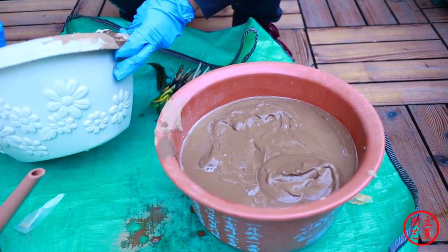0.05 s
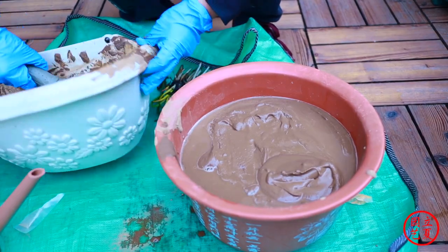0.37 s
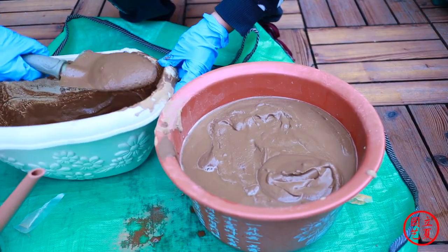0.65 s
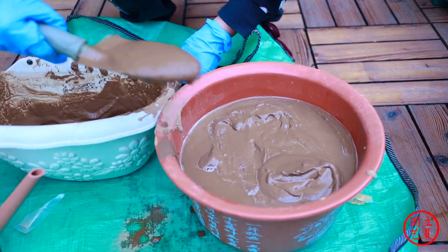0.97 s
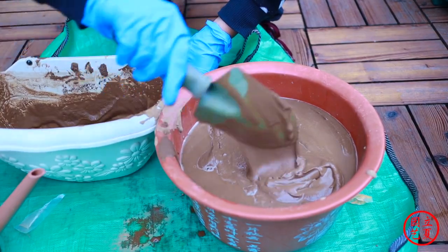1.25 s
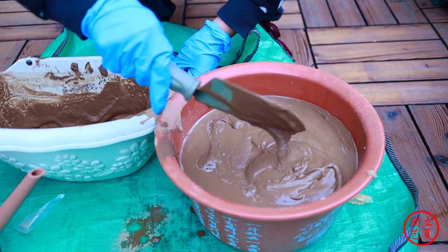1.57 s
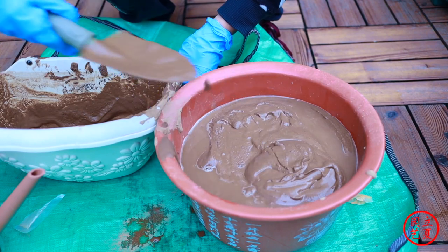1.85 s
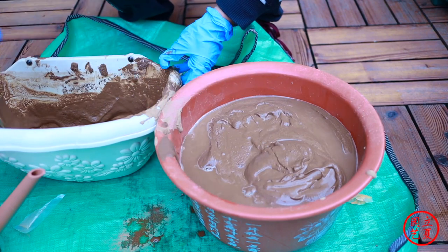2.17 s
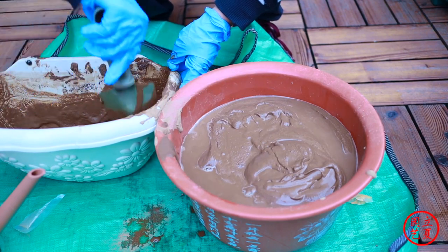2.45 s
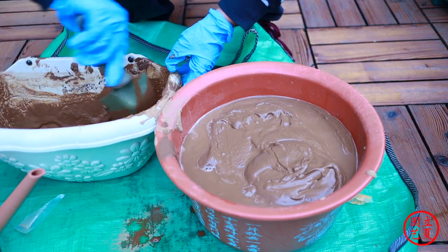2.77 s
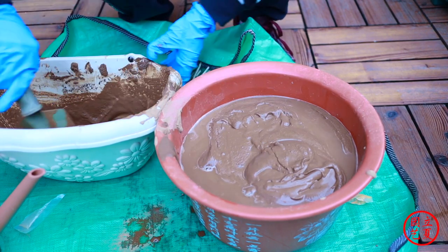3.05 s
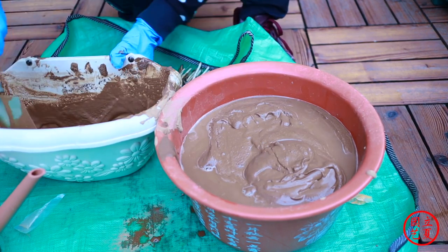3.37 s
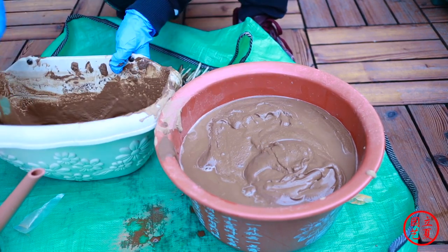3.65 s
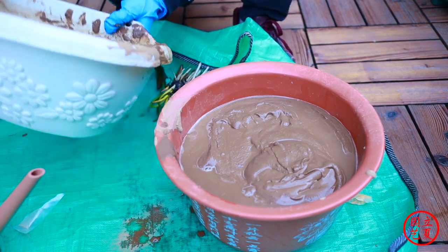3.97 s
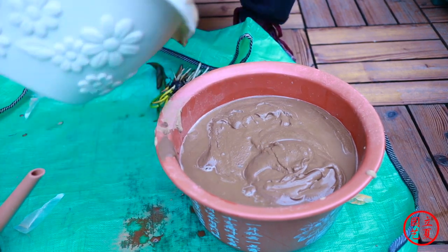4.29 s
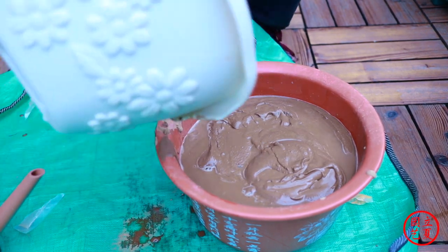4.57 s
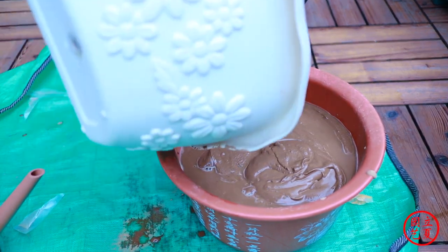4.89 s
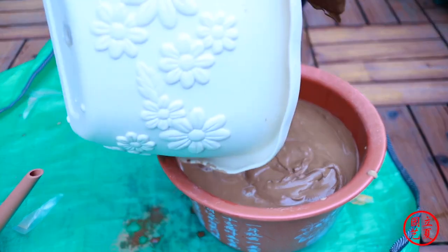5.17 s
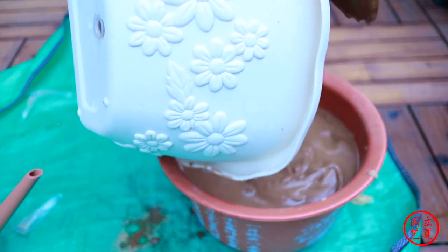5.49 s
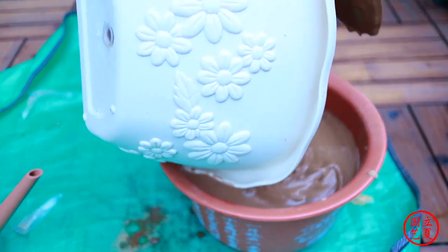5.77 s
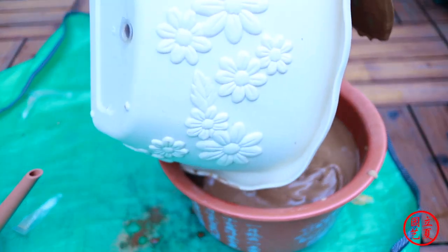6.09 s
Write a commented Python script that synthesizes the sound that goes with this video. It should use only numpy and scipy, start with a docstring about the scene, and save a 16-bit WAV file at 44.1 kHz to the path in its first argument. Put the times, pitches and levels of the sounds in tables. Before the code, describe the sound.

Thick mud is scooped from a plastic pot, then a blade scrapes its wall and rubber gloves knock and creak on it.

```python
"""Outdoors, over a soft rumble, a trowel scoops thick mud from a plastic flowerpot on a deck.
Each slip and knock rings the pot's wall and hollow. Near 1 s the mud tears free, air pockets bursting,
and drops into a second pot. A small bird calls three times, far off. From 2.35 s the blade scrapes
the wall clean in four gritty strokes while the pot thuds on the boards. From 3.8 s the pot is lifted
and tipped: rubber gloves knock and creak on it, a sleeve brushes past. Last, a faint drip or tick."""
import sys
import numpy as np
from scipy import signal
from scipy.fft import rfft, irfft
from scipy.io import wavfile
from scipy.ndimage import uniform_filter1d

SR = 44100
rng = np.random.default_rng(int(sys.argv[2]) if len(sys.argv) > 2 else 0)


def digitize_waveform(pressure):
    """Quantize a signal to 16-bit integers and store it at the path in sys.argv[1].

    Rows of a 2-D input are taken as channels; values are limited to [-1, 1].
    """
    field = np.atleast_2d(pressure).T
    bounded = np.clip(field, -1, 1)
    quanta = np.round(bounded * 32767).astype(np.int16)
    wavfile.write(sys.argv[1], SR, quanta)


N = 279153
TIME_S = np.arange(N) / SR

# Table levels are relative; the functions add the gain of each layer.
# background rumble, glove crinkle: time_s, level_db
RUMBLE_LEVEL = [(0, -48.5), (.9, -56), (1.7, -63.5), (2.2, -63), (2.7, -56), (4.85, -52), (5.25, -57.5),
                (6.33, -60)]
CRINKLE_LEVEL = [(0.0, -55.5), (0.49, -52), (0.63, -68), (0.81, -68.5), (1.69, -77.5), (2.29, -78),
                 (2.45, -69), (2.89, -68), (4.05, -61), (4.67, -63), (4.95, -73), (5.61, -79.5),
                 (6.33, -80.5)]
# noise spectra: freq_hz, density_db
RUMBLE_SPECTRUM = [(15, -73), (25, -56), (80, -9), (114, -6), (137, -0.5), (170, -4.5), (263, 0.5),
                   (309, -4), (344, -2), (531, -3.5), (818, -1), (1650, -9), (3520, -23), (6210, -29.5),
                   (16000, -38)]
CRINKLE_SPECTRUM = [(880, -19), (1500, -8), (2460, -12.5), (3410, -5), (4330, -11), (9470, -14.5),
                    (11300, -20.5), (13500, -17), (16000, -26.5)]
MUD_SPECTRUM = [(53, -39), (90, -5), (402, -2.5), (721, -4), (876, 2), (1140, -11), (1950, -3), (4650, -27),
                (7820, -22.5), (16000, -39)]
SCOOP_GRIT = [(1500, -15.5), (2100, 0.5), (2900, 0.5), (4030, -0.5), (7050, -9), (8560, -7), (11400, -17),
              (13500, -12), (16000, -23)]
SCRAPE_GRIT = [(1500, -16.5), (2100, 3), (2700, 0.5), (3650, 0.5), (4400, -4), (5500, -5.5), (6990, -9),
               (8500, -6), (10200, -16), (13900, -13), (16000, -28.5)]
GRIP_GRIT = [(1500, -25), (2100, 4.5), (2900, 3), (3900, -1), (6660, -18.5), (8850, -13.5), (10000, -24),
             (13500, -29), (16000, -24)]
# bird calls: start_s, length_s, start_hz, end_hz, level_db
CHIRPS = [(1.192, 0.093, 3920, 3220, -63), (1.7, 0.11, 4170, 3060, -70.5), (2.21, 0.13, 3420, 3620, -68)]
# sleeve brushes, pot settling on the deck: time_s, level_db
BRUSHES = [(1.37, -68), (3.79, -54.5), (4.047, -51), (4.295, -57), (4.543, -52), (4.63, -60),
           (4.783, -56.5), (4.84, -64.5), (5.38, -65.5)]
THUDS = [(0.852, -38), (1.158, -52), (2.414, -37), (2.51, -38), (2.769, -29), (3.223, -30.5)]
# mud leaves the pot, then the blade: snap_s, swell_s, level_db, pocket_db
TEARS = [(0.816, 0.02, -48, -42), (.848, 0.019, -49, -58), (1.16, 0.084, -44.5, -53.5)]

# deck boards, trowel blade, bare plastic wall: freq_hz, width_hz, level_db
DECK_MODES = [(88.4, 20, -27), (131, 67, 2.5), (219, 23, 8.5)]
BLADE_MODES = [(3492, 90, -3), (3654, 80, -5), (3771, 60, 0), (5184, 70, -3), (8200, 200, -8),
               (9250, 80, -3)]
WALL_MODES = [(557, 40, -4), (722, 45, 2), (815, 60, 1), (940, 80, -1), (1129, 60, -1), (1392, 60, 0),
              (1554, 55, -2), (1739, 60, -2), (1917, 55, -2), (2094, 55, -4), (2348, 65, -3),
              (2466, 70, -6)]
# mud-coated wall: freq_hz, density_db
DAMPED_WALL = [(520, -1.5), (750, 0), (1050, 4), (1500, 8), (2100, 3), (2500, -5.5)]
# air in the pot, tuned by the hand in its mouth: time_s, pitch_hz
HOLLOW_PITCH = [(.17, 467), (.35, 395), (.48, 414), (.6, 431), (2.55, 428), (3.86, 444), (3.91, 384),
                (4.4, 393), (4.49, 467), (4.8, 452)]
# modes of that air: pitch_ratio, width_hz, level_db
HOLLOW_MODES = [(.7, 70, -16), (.88, 32, -4), (1, 24, 0), (1.15, 40, -11), (1.28, 45, -11), (2.07, 50, -14)]

# blade in mud, on bare wall: start_s, length_s, wall_db, hollow_db, grit_db, gap_start_hz, gap_end_hz
SCOOPS = [(.04, 0.063, -32.5, -37.5, -40, 603, 814), (.135, 0.13, -35.5, -35.5, -45.5, 1390, 1700),
          (.205, .11, -29, -36, -40, 793, 544), (.325, 0.025, -41, -29, -58, 570, 530),
          (.435, .06, -39.5, -34, -53.5, 602, 590), (.503, 0.069, -31.5, -29, -46, 1100, 940),
          (.58, 0.044, -30, -26.5, -42.5, 940, 1080), (.645, .018, -30.5, -30, -45, 1730, 2170)]
SCRAPES = [(2.355, 0.055, -26.5, -53, -30.5, 840, 745), (2.421, 0.02, -23.5, -47, -26, 1560, 1380),
           (2.447, 0.026, -26.5, -45, -28.5, 1370, 1130), (2.485, 0.1, -29.5, -35.5, -36.5, 1160, 1140),
           (2.768, 0.033, -34, -35.5, -43.5, 760, 720), (2.796, 0.053, -23.5, -33.5, -28.5, 3730, 3570),
           (2.848, 0.05, -34.5, -39, -34, 900, 930), (3.131, 0.016, -33, -46, -42.5, 716, 740),
           (3.153, 0.011, -27.5, -49, -37, 750, 814), (3.481, 0.01, -44.5, -56, -42, 830, 840),
           (3.509, 0.034, -26.5, -45.5, -38, 845, 826)]
# gloves rubbing the pot, then a faint drip or trowel tick:
# start_s, length_s, wall_db, hollow_db, grit_db
GRIPS_AND_TICK = [(3.81, 0.016, -43, -49, -57), (3.857, 0.0047, -31, -35, -42),
                  (3.929, 0.01, -36.5, -36, -39.5), (3.961, 0.0057, -33.5, -32, -44.5),
                  (4.128, 0.025, -46, -36.5, -62), (4.392, 0.045, -48, -41, -71),
                  (4.418, 0.0072, -33.5, -48, -43), (4.474, 0.011, -31, -32.5, -43),
                  (4.78, 0.013, -57, -44.5, -57), (4.9, 0.044, -69, -53, -67.5),
                  (5.34, 0.0084, -52, -57.5, -58)]
# blade and hands striking the pot, then the drip or tick: start_s, wall_db, hollow_db, grit_db
KNOCKS = [(0.209, -19, -21.5, -42), (0.332, -49, -20, -45), (0.427, -47, -33, -45),
          (0.501, -46, -22.5, -43), (0.542, -34, -35, -37.5), (0.739, -4, -44, -55), (0.799, -47, -57, -51),
          (2.352, -24, -67, -54), (2.388, -16, -53, -34), (2.402, -21, -48, -26), (2.421, -14, -39, -22.5),
          (2.441, -25, -52, -27), (2.503, -34, -27, -46), (2.764, -15, -42, -53), (2.793, -21, -44, -30.5),
          (3.089, -51, -59, -51), (3.126, -37, -53, -39), (3.164, -30, -48, -31),
          (3.215, -33, -29.5, -35.5), (3.227, -29.5, -31, -30), (3.253, -40, -37, -43),
          (3.452, -40, -56, -50), (3.557, -28, -65, -40), (3.904, -27, -22, -44.5), (3.957, -22, -22, -42),
          (4.001, -24, -21.5, -47), (4.472, -20, -42, -46), (5.208, -50, -52, -64), (5.337, -50, -60, -54)]
# stroke envelopes: attack_s, release_s, fade_db, hollow_swell_db
SCOOP_SHAPE, SCRAPE_SHAPE, GRIP_SHAPE = (.011, .015, 1, 2), (.0065, .011, 1.5, 3), (.007, .01, 1.5, 3)
# wet rubber slipping: start_s, length_s, start_hz, end_hz, level_db
GLOVE_SQUEAK = (4.756, .078, 14500, 13000, -64)
BARE_BLADE_DB = -23


def from_db(db):
    """Decibels to gain."""
    return 10 ** (np.asarray(db) / 20)


def unit_rms(x):
    """Scale to unit rms."""
    return x / np.sqrt(np.mean(x ** 2) + 1e-20)


def drift(rate_hz):
    """Random curve through unit-variance knots."""
    knots = rng.standard_normal(N // 20)
    return np.interp(TIME_S * rate_hz, np.arange(len(knots)), knots)


def curve(points):
    """Linear interpolation over time."""
    return np.interp(TIME_S, *np.transpose(points))


def envelope(start_s, length_s, attack_s, release_s, tilt_db):
    """Exponential attack, tilted hold, exponential release."""
    early_s, late_s = np.maximum(start_s - TIME_S, 0), np.maximum(TIME_S - start_s - length_s, 0)
    progress = np.clip((TIME_S - start_s) / max(length_s, 1 / SR), 0, 1)
    edges = np.minimum(early_s / attack_s + late_s / release_s, 20)
    return from_db(tilt_db * (progress - .5)) * np.exp(-edges)


def high_pass(x, hz):
    """Second-order bass cut."""
    return signal.sosfilt(signal.butter(2, hz, "high", fs=SR, output="sos"), x)


def soften(x, hz):
    """Soft contact: first-order treble cut."""
    return signal.sosfilt(signal.butter(1, min(hz, 12000), fs=SR, output="sos"), x)


def convolve(x, response):
    """Filter with unit power gain."""
    return signal.oaconvolve(x, response / np.linalg.norm(response))[:N]


def colour(x, spectrum):
    """Minimum-phase filter, steep beyond the ends of the spectrum."""
    size = 4096
    hz, density_db = np.transpose(spectrum)
    bin_oct, knot_oct = np.log2(np.maximum(np.arange(size // 2 + 1), .5) * SR / size), np.log2(hz)
    outside_oct = np.minimum(abs(bin_oct - np.clip(bin_oct, knot_oct[0], knot_oct[-1])), 2)
    gain = from_db(np.interp(bin_oct, knot_oct, density_db) - 35.1 * outside_oct)
    causal_cepstrum = 2 * irfft(np.log(gain)) * (np.arange(size) < size // 2)
    return convolve(x, irfft(np.exp(rfft(causal_cepstrum))))


def resonate(x, modes):
    """Parallel decaying modes."""
    t = TIME_S[:SR // 8]
    return convolve(x, sum(from_db(db) * width_hz * np.exp(-np.pi * width_hz * t)
                           * np.cos(2 * np.pi * hz * t) for hz, width_hz, db in modes))


def gliding_mode(x, hz, pole):
    """One resonance with a moving pitch."""
    turn = np.exp(2j * np.pi * np.cumsum(hz) / SR)
    return (turn * signal.lfilter([1], [1, -pole], x / turn)).imag


def echoes(x, t60_s, delay_s):
    """Diffuse tail from surrounding surfaces."""
    t = TIME_S[:SR // 2]
    return convolve(x, rng.standard_normal(len(t)) * from_db(-60 * t / t60_s) * (t > delay_s))


def friction(slips_per_s, spread_db, smooth_db, judder_db, judder_hz):
    """Stick-slip at unit level: uneven clicks over a smooth slide, bunched by judder."""
    sizes = from_db(spread_db * np.minimum(rng.exponential(1, N), 3.5)) * rng.choice([-1, 1], N)
    clicks = unit_rms(sizes * (rng.random(N) < slips_per_s / SR))
    slide = from_db(smooth_db) * rng.standard_normal(N)
    slips = (clicks + slide) * from_db(judder_db * drift(judder_hz))
    return slips / np.sqrt(uniform_filter1d(slips ** 2, size=900) + 1e-9)


def rumble():
    """Distant low noise, slowly changing in level."""
    return from_db(curve(RUMBLE_LEVEL) - 1.38) * colour(rng.standard_normal(N), RUMBLE_SPECTRUM)


def bird():
    """Short rough glides that flatten at the end, smeared by distance."""
    calls, warble_hz = np.zeros(N), 280 * drift(rate_hz=800)
    for start_s, length_s, start_hz, end_hz, db in CHIRPS:
        progress = np.clip((TIME_S - start_s) / length_s, 0, 1)
        hz = end_hz + (start_hz - end_hz) * (1 - progress) ** 2 + warble_hz
        arch = np.sqrt(progress * (1 - progress))
        calls += from_db(db) * arch * np.sin(2 * np.pi * np.cumsum(hz) / SR)
    return from_db(9.5) * echoes(calls, t60_s=.17, delay_s=.001)


def rustle():
    """Gloves and sleeve crinkle as the arms move."""
    crinkle = friction(slips_per_s=900, spread_db=3.5, smooth_db=0, judder_db=8, judder_hz=40)
    brushes = sum(from_db(db) * envelope(time_s, 0, attack_s=.029, release_s=.034, tilt_db=0)
                  for time_s, db in BRUSHES)
    return np.maximum(from_db(curve(CRINKLE_LEVEL) - 2.5), brushes) * colour(crinkle, CRINKLE_SPECTRUM)


def deck_thuds():
    """The settling pot pushes dully into the boards."""
    pushes = np.zeros(N)
    for time_s, db in THUDS:
        pushes[round(time_s * SR)] = from_db(db + 14.5)
    return high_pass(soften(resonate(pushes, DECK_MODES), hz=236), hz=80.5)


def mud(rise_db_per_s=244):
    """Tiny air pockets burst; each tear swells, then snaps."""
    pops = friction(slips_per_s=770, spread_db=3, smooth_db=6.5, judder_db=3.5, judder_hz=660)
    tearing = 0
    for snap_s, swell_s, db, _ in TEARS:
        rise_db = rise_db_per_s * swell_s
        swell = envelope(snap_s - swell_s, swell_s, attack_s=.002, release_s=.0096, tilt_db=rise_db)
        tearing += from_db(db - rise_db / 2) * swell
    return from_db(1.8) * tearing * colour(pops, MUD_SPECTRUM)


def gap_rings(q=16.7, overhang_s=.017, pocket_glide_hz=(1930, 2070)):
    """Slips ring one glide each: the gap between blade and mud, a tear's air pocket, the glove squeak."""
    slips = friction(slips_per_s=900, spread_db=4.5, smooth_db=-14.5, judder_db=2.5, judder_hz=200)
    gaps = [(start_s - overhang_s, length_s + 2 * overhang_s, start_hz, end_hz, wall_db + share_db)
            for rows, share_db in ((SCOOPS, -4.5), (SCRAPES, -8))
            for start_s, length_s, wall_db, _, _, start_hz, end_hz in rows]
    pockets = [(snap_s - swell_s, swell_s, *pocket_glide_hz, db) for snap_s, swell_s, _, db in TEARS]
    out = np.zeros(N)
    for start_s, length_s, start_hz, end_hz, db in gaps + pockets + [GLOVE_SQUEAK]:
        at, size = max(round(start_s * SR), 0), round(length_s * SR)
        pole = np.exp(-np.pi * start_hz / q / SR)
        ring = gliding_mode(slips[at:at + size], np.linspace(start_hz, end_hz, size), pole)
        arch = np.sin(np.linspace(0, np.pi, size))
        out[at:at + size] += from_db(db) * unit_rms(high_pass(ring, start_hz / 2)) * arch
    return out


def grit(push, spectrum, blade_db):
    """Sand crunches under the edge and rings the blade."""
    return colour(push + from_db(blade_db) * resonate(push, BLADE_MODES), spectrum)


def hollow(push):
    """The air in the pot booms at a moving pitch."""
    pitch_hz = curve(HOLLOW_PITCH)
    boom, power = 0, 0
    for k, (ratio, width_hz, db) in enumerate(HOLLOW_MODES):
        pole = np.exp(-np.pi * width_hz / SR)
        gain = from_db(db) * (1 - pole)
        boom += (-1) ** k * gain * gliding_mode(push, ratio * pitch_hz, pole)
        power += gain ** 2 / (1 - pole ** 2) / 2
    return high_pass(boom / np.sqrt(power), hz=240)


def plastic_wall(push):
    """Bare plastic rings; mud-coated plastic sounds dead."""
    ringing = high_pass(resonate(push, WALL_MODES), hz=445)
    return from_db(-10) * ringing + from_db(-2) * colour(push, DAMPED_WALL)


def moving_contact(slips, reflection=.5):
    """Slips return from the wall's edge; the lag wanders with the contact point."""
    lag_s = .000616 * np.exp(.34 * drift(rate_hz=35))
    returned = np.interp(TIME_S - lag_s, TIME_S, slips)
    return (slips - reflection * returned) / np.sqrt(1 + reflection ** 2)


def knocks(crunch_db=2, crunch_s=.0028):
    """A click, then crushed grains; grittier is harder. Returns wall push, hollow push, grit sound."""
    pushes, t = np.zeros((3, N)), TIME_S[:SR // 40]
    click = 1.0 * (t == 0)
    for start_s, *levels_db in KNOCKS:
        wall, air, sand = from_db(levels_db)
        grains = rng.standard_normal(len(t)) * np.exp(-t / crunch_s)
        hit = click + from_db(crunch_db) * grains / np.linalg.norm(grains)
        at = round(start_s * SR)
        pushes[:, at:at + len(t)] += [wall * soften(hit, 12000 * sand / wall), air * click, sand * hit]
    on_wall, on_hollow, on_grit = pushes
    crunch = grit(on_grit, SCRAPE_GRIT, BARE_BLADE_DB)
    return np.array([from_db(10.5) * on_wall, from_db(23.5) * on_hollow, from_db(16.5) * crunch])


def pressures(rows, shape, hollow_release_s=.017):
    """Drive on wall, hollow and grit: the edge eases off as weight shifts into the flexing pot."""
    attack_s, release_s, fade_db, swell_db = shape
    drive = np.zeros((3, N))
    for start_s, length_s, wall_db, hollow_db, grit_db, *_ in rows:
        edge = envelope(start_s, length_s, attack_s, release_s, -fade_db)
        weight = envelope(start_s, length_s, attack_s, hollow_release_s, swell_db)
        stroke = [from_db(wall_db) * edge, from_db(hollow_db) * weight, from_db(grit_db) * edge]
        drive = np.maximum(drive, stroke)
    return drive


def strokes(rows, shape, slips, spectrum, soft_hz, wall_db, hollow_db, grit_db, blade_db):
    """One slip train under pressure. Returns wall push, hollow push, grit sound."""
    wall, air, sand = pressures(rows, shape)
    rasp = moving_contact(slips)
    return np.array([from_db(wall_db) * soften(wall * rasp, soft_hz),
                     from_db(hollow_db) * air * slips,
                     from_db(grit_db) * grit(sand * rasp, spectrum, blade_db)])


def pot():
    """Wet scoops, juddering scrapes, glove creaks, knocks and a last tick all ring the same pot."""
    wet = friction(slips_per_s=1100, spread_db=0, smooth_db=.5, judder_db=-1, judder_hz=99)
    bare = friction(slips_per_s=1400, spread_db=3.2, smooth_db=-4, judder_db=3.2, judder_hz=210)
    rubber = friction(slips_per_s=470, spread_db=.5, smooth_db=1, judder_db=-3.5, judder_hz=160)
    scoops = strokes(SCOOPS, SCOOP_SHAPE, wet, SCOOP_GRIT,
                     soft_hz=1420, wall_db=-2.5, hollow_db=-2, grit_db=0, blade_db=-27)
    scrapes = strokes(SCRAPES, SCRAPE_SHAPE, bare, SCRAPE_GRIT,
                      soft_hz=5040, wall_db=-4, hollow_db=-2, grit_db=-4, blade_db=BARE_BLADE_DB)
    grips_and_tick = strokes(GRIPS_AND_TICK, GRIP_SHAPE, rubber, GRIP_GRIT,
                             soft_hz=1940, wall_db=-2.2, hollow_db=0, grit_db=.5, blade_db=-52)
    on_wall, on_hollow, crunch = scoops + scrapes + grips_and_tick + knocks()
    return plastic_wall(on_wall) + hollow(on_hollow) + crunch


def scene():
    """Mono mix: close work, rumble, faint echoes off deck and walls, bird."""
    near = pot() + gap_rings() + deck_thuds() + mud() + rustle()
    background = rumble()
    deck_echo = from_db(-19) * echoes(near, t60_s=.07, delay_s=.002)
    wall_echo = from_db(-24) * echoes(near, t60_s=.35, delay_s=.012)
    return (near + background + deck_echo + wall_echo + bird())[None]


def record(dry):
    """Steep low-pass."""
    cutoff_hz = 15900
    return signal.sosfilt(signal.ellip(10, .2, 70, cutoff_hz, fs=SR, output="sos"), dry)


dry = scene()
out = record(dry)
digitize_waveform(out)
```